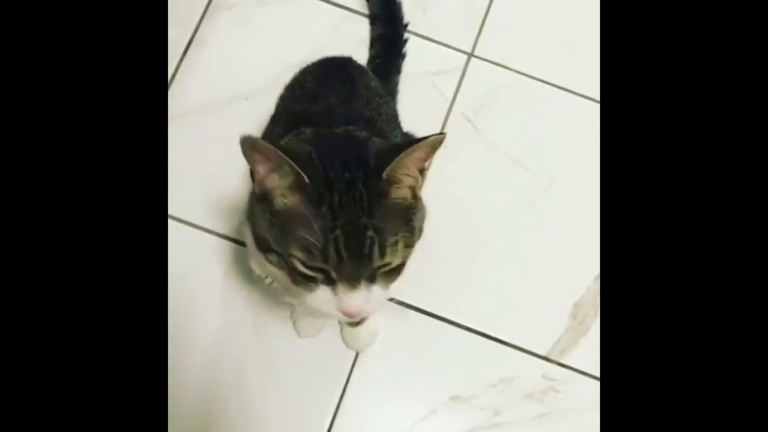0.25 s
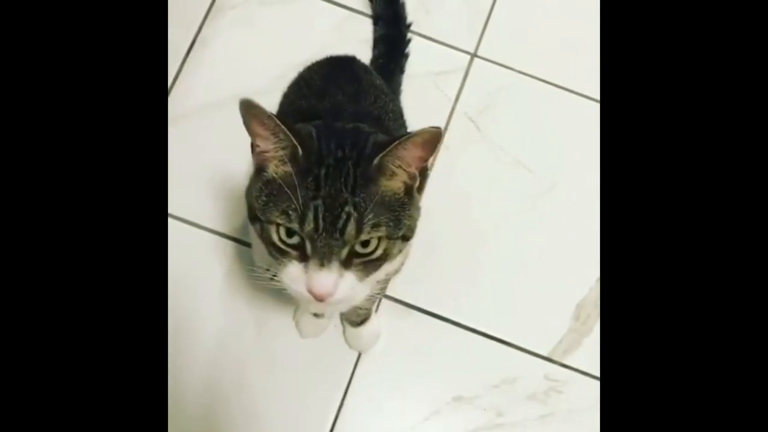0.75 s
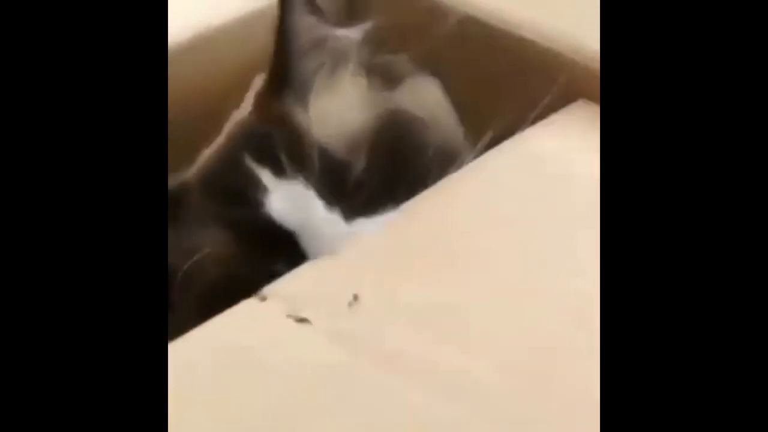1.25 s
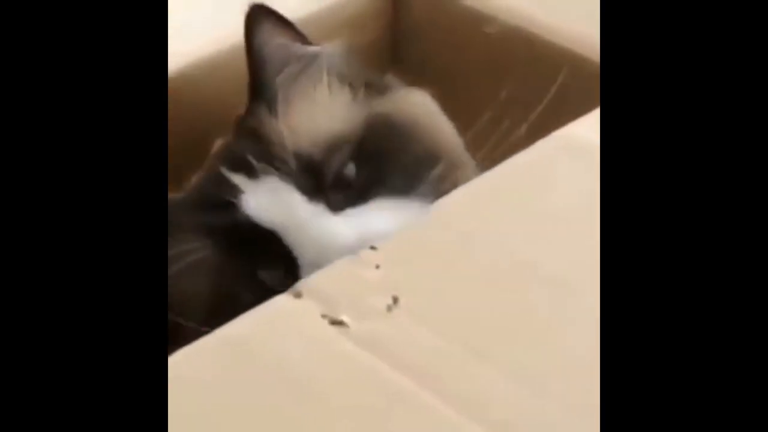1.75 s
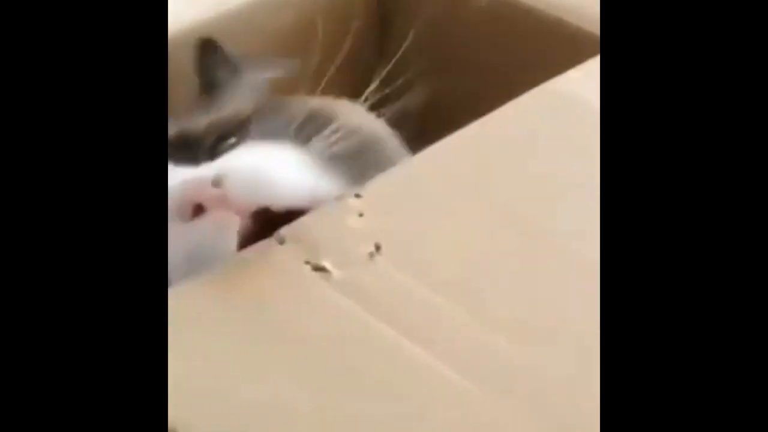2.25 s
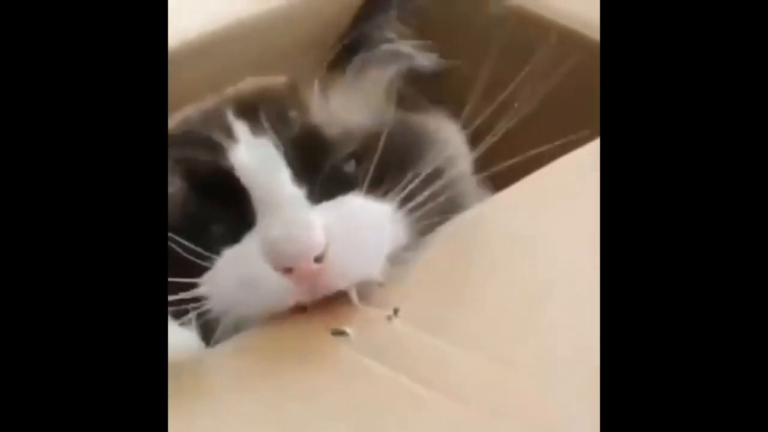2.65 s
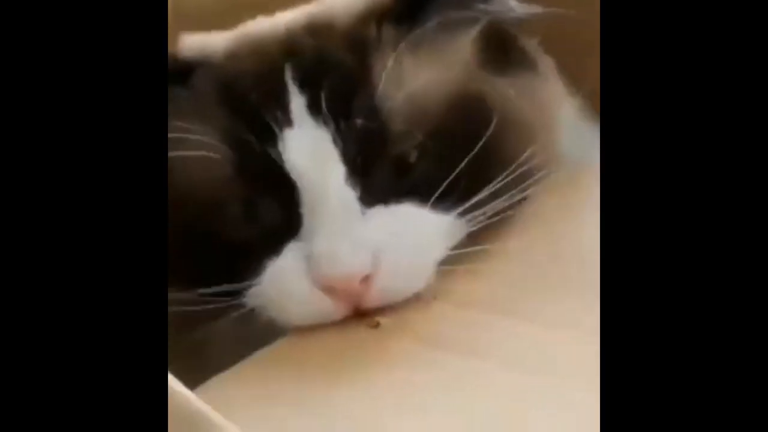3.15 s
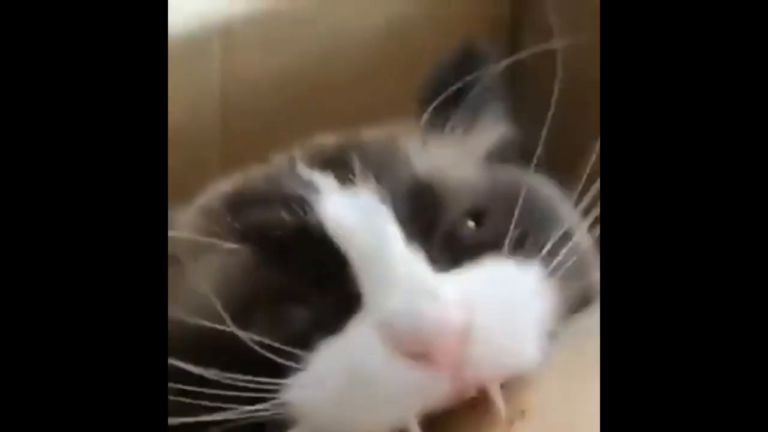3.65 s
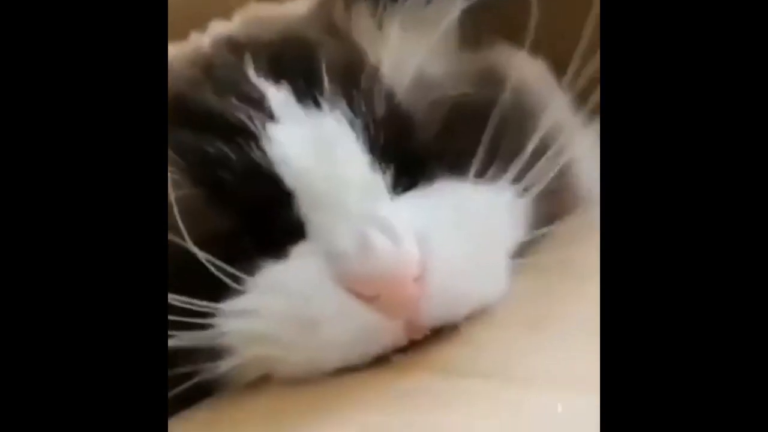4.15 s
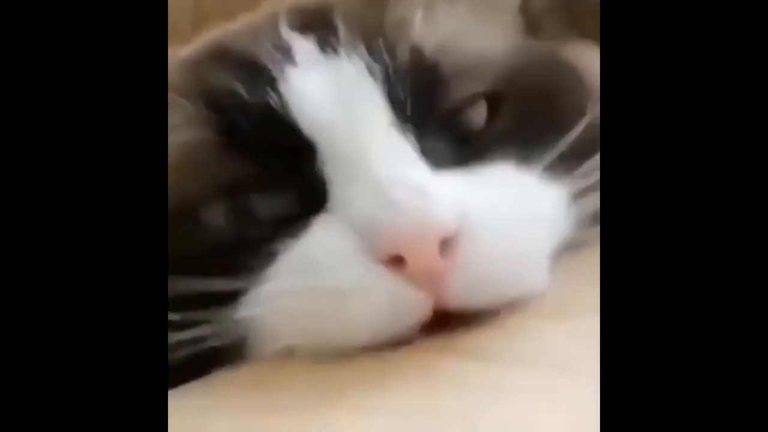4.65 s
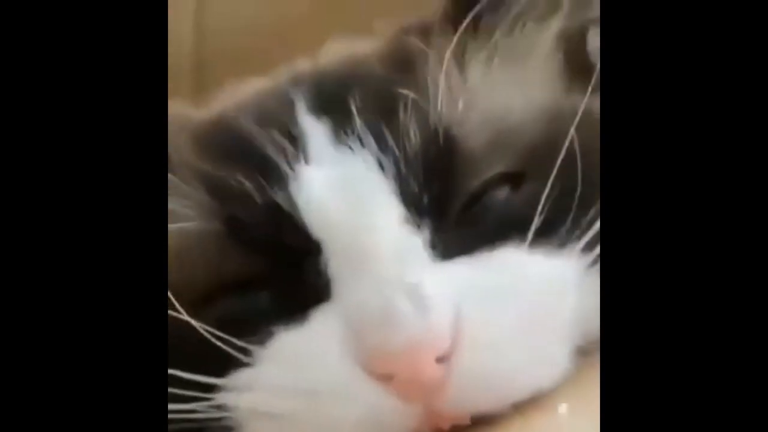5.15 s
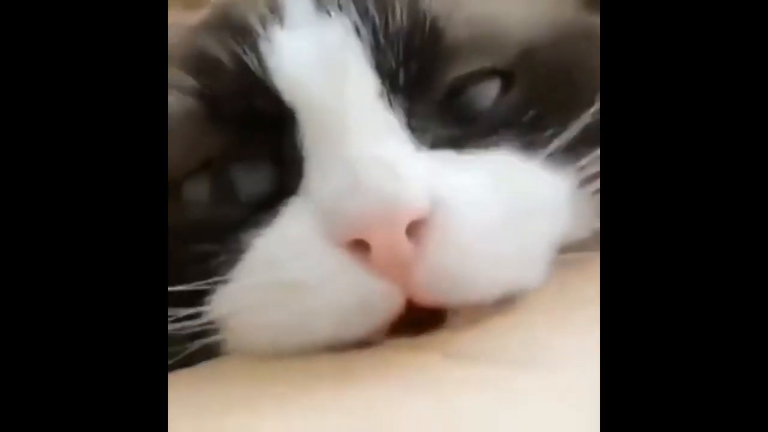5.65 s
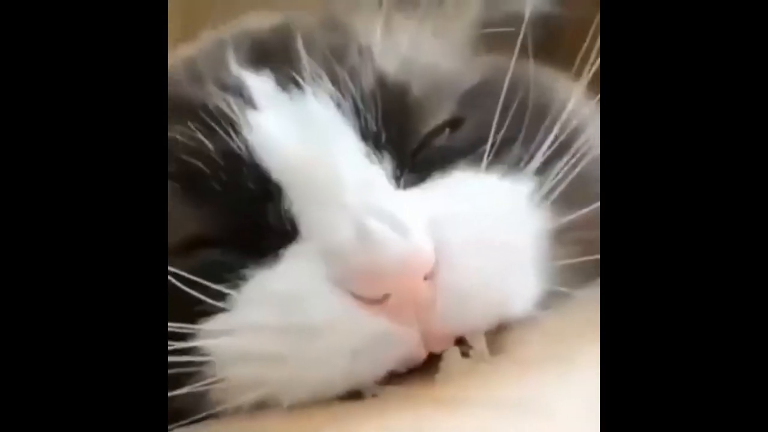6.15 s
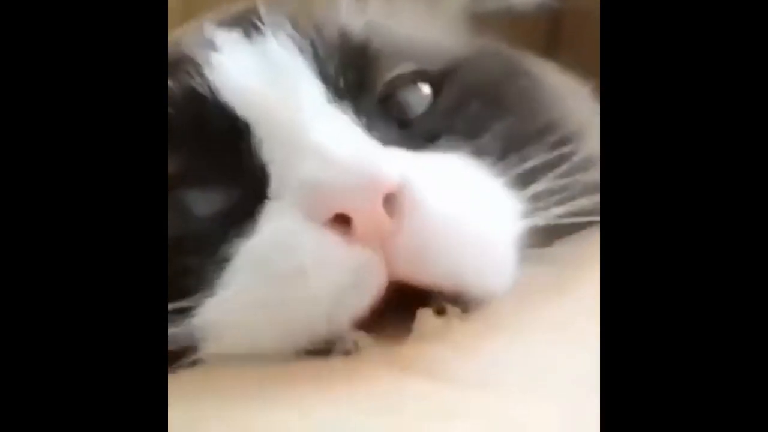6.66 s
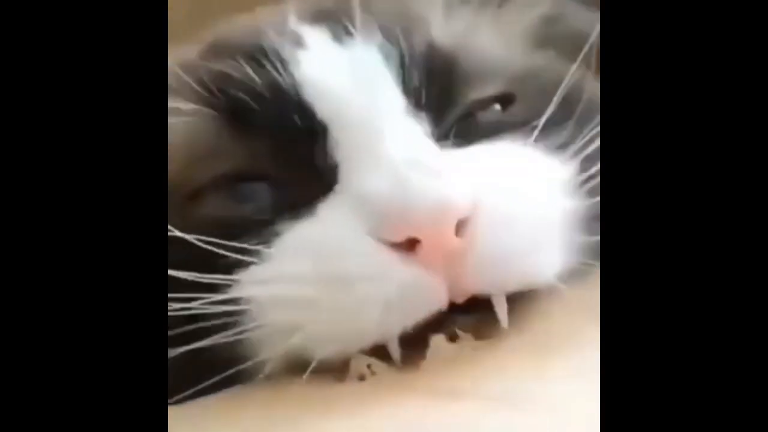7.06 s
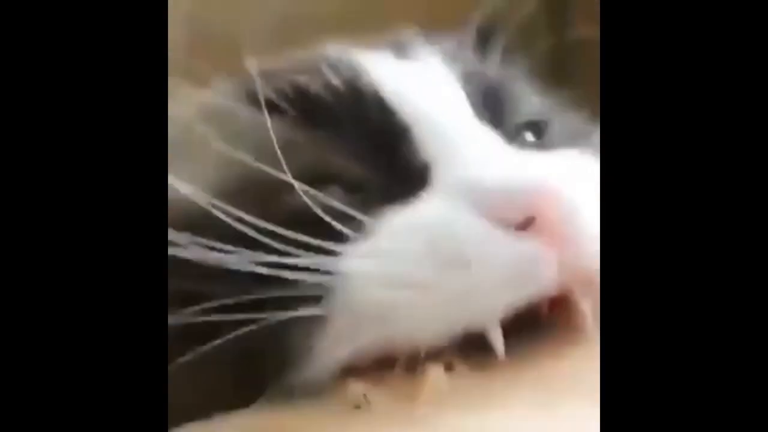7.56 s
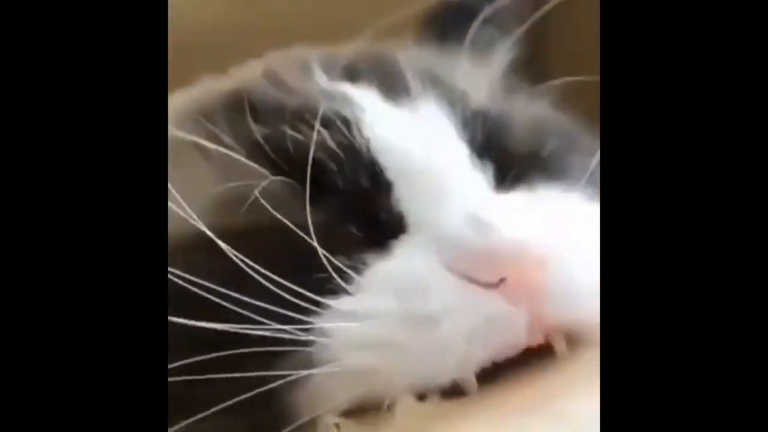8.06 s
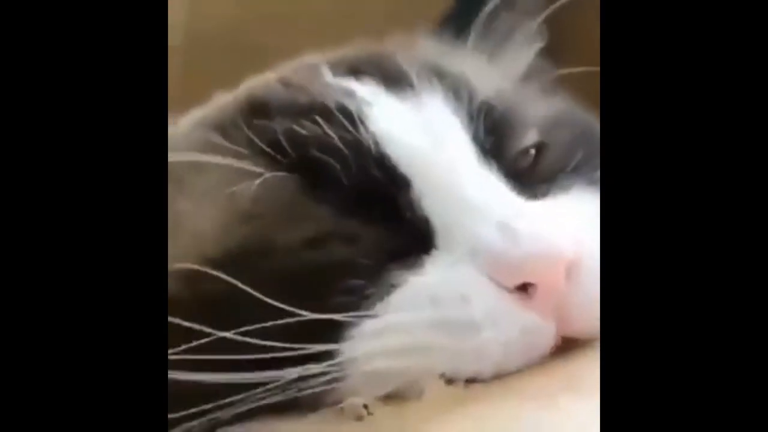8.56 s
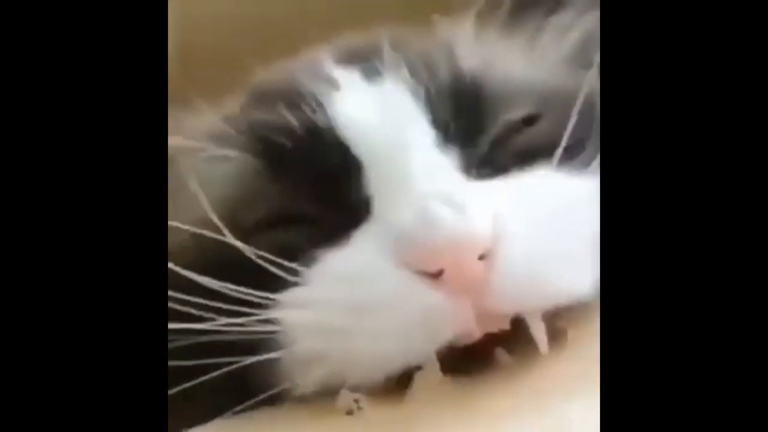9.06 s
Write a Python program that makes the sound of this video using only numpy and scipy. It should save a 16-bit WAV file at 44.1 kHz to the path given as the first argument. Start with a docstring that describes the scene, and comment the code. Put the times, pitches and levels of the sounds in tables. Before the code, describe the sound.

Close, irregular crunches and rasping tears of cardboard as a cat chews the edge of a box in a quiet room.

```python
"""Faint air in a quiet room, a short silence, then a cat gnaws the edge of a cardboard box close by.
Teeth rub and tear the paper fibres, and twice the muzzle drags along the edge. The flutes (the wavy
ribs inside cardboard) crack and crunch, the panel knocks as it buckles, and a slipping tooth groans
or squeaks. The box and the small room ring briefly after the bites."""
import sys
import numpy as np
from scipy import signal
from scipy.fft import rfft, irfft
from scipy.io import wavfile
from scipy.ndimage import uniform_filter1d

SR = 44100
rng = np.random.default_rng(int(sys.argv[2]) if len(sys.argv) > 2 else 0)


def output_pcm(signal):
    """Save a mono or channel-first signal as 16-bit PCM at the path in sys.argv[1].

    Samples are clipped to [-1, 1] before scaling.
    """
    pcm = np.clip(np.atleast_2d(signal).T, -1, 1) * 32767
    wavfile.write(sys.argv[1], SR, np.round(pcm).astype(np.int16))


N = 411012
TIME = np.arange(N) / SR

# Tone colours of the room air, the paper fibres, the flat panel and the hollow box.
# Each row: frequency in Hz, relative level in dB.
AIR_COLOUR = [(25, -10.5), (110, 1.5), (330, -9.5), (500, -16), (1000, -16), (2200, -27), (5000, -31.5),
              (14000, -35.5)]
FIBRE_COLOUR = [(1300, -26.5), (3000, -3.5), (5000, 0.5), (6500, -1.5), (8200, -0.5), (9600, -3),
                (12000, -0.5), (14000, -6.5)]
PANEL_COLOUR = [(400, -7), (720, 2.5), (1150, 2), (1750, -1), (2200, -0.5), (2900, -5.5), (4500, -15)]
BOX_COLOUR = [(25, -21), (100, -9), (200, -2.5), (400, 3), (620, 0.5), (1100, -21.5)]
# Strokes of the teeth over the paper. Each row: peak time, rise and fall in seconds,
# relative level of the fibre hiss in dB, panel rasp in dB above the hiss.
TOOTH_STROKES = [(2.15, .25, 0.32, -50, -11), (2.385, 0.036, 0.07, -56, 12.5), (2.65, 0.12, 0.11, -54, 2.5),
                 (2.83, 0.045, .03, -42, -10), (2.884, 0.031, 0.047, -34.5, -7),
                 (3.0, 0.029, 0.06, -36.5, -7.5), (3.075, 0.053, 0.069, -36, -6.5),
                 (3.24, 0.082, 0.054, -36, -11.5), (3.32, 0.052, 0.064, -29.5, -2),
                 (3.45, .06, 0.18, -49.5, 1.5), (3.8, 0.077, 0.13, -44, 0.5),
                 (3.94, 0.053, 0.025, -37.5, -2.5), (4.08, 0.11, 0.032, -35.5, -4),
                 (4.21, 0.18, 0.19, -42, -3.5), (4.385, 0.07, 0.052, -34, -8),
                 (4.46, 0.044, 0.1, -36, -10.5), (4.638, 0.014, .02, -40, -3.5),
                 (4.8, 0.12, 0.14, -43.5, -5), (4.935, .012, 0.27, -51.5, 7.5),
                 (5.275, 0.033, .045, -38.5, -3), (5.36, 0.033, .035, -37.5, -10.5),
                 (5.44, 0.03, 0.029, -38, -3.5), (5.52, 0.021, 0.068, -35, -9),
                 (5.64, 0.044, 0.099, -43.5, -2), (5.795, .015, 0.018, -35, -6.5),
                 (5.97, 0.11, 0.072, -43.5, 1.5), (6.05, 0.027, 0.02, -39.5, -7),
                 (6.125, 0.011, 0.034, -46, 3), (6.217, 0.035, 0.037, -41.5, -5),
                 (6.322, 0.03, 0.035, -32.5, -8), (6.49, 0.076, 0.15, -34.5, -5),
                 (6.63, 0.034, 0.017, -28, -3.5), (6.66, .02, 0.072, -45, -1),
                 (6.92, 0.062, 0.049, -44.5, 2.5), (7.035, 0.028, 0.091, -46, 2.5),
                 (7.21, 0.12, 0.035, -45, -5), (7.59, 0.042, 0.066, -35.5, 1), (7.846, .035, .03, -34, -1),
                 (7.96, 0.022, .07, -45, 3), (8.181, .06, 0.027, -35, -6),
                 (8.27, 0.033, 0.029, -36.5, -4.5), (8.36, 0.037, 0.034, -38.5, -3.5),
                 (8.445, 0.023, 0.013, -37.5, -5), (8.535, 0.061, 0.12, -35.5, -10),
                 (8.815, 0.019, .04, -43.5, 10), (8.89, 0.049, 0.088, -61, 16),
                 (9.005, 0.031, 0.023, -42, 2), (9.05, .03, 0.15, -54.5, 7.5),
                 (9.225, 0.012, .06, -40, -2.5)]
# Notes at which the box rings, under a hard bite and under a drag of the muzzle.
# Each row: frequency in Hz, width in Hz, gain in dB.
BITE_RESONANCES = [(272, 10.5, 1), (342.5, 22, 4.5), (446, 15, 10), (788, 59, -12), (1208, 150, 6)]
DRAG_RESONANCES = [(173, 51, 3.5), (232, 16, 0), (347.4, 5.8, 16), (830, 68, 0.5), (1470, 130, 7.5),
                   (2100, 640, 9), (11800, 930, 2)]
# Two drags of the muzzle, one list each. Each row: time in seconds, relative level of the fibre
# hiss in dB, then panel rasp and box rumble, both in dB above the hiss.
MUZZLE_DRAGS = [
    [(1.483, -39.5, -1.5, 2), (1.5, -36, -8.5, -11), (1.545, -35.5, -12, -22), (1.585, -52, -9, -7)],
    [(3.495, -41, -6, -2), (3.518, -28.5, 1.5, -5), (3.557, -24, -3, 0.5), (3.65, -26.5, -8, -13),
     (3.715, -18.5, -10, -19), (3.755, -43.5, -12, 4)],
]
# The loudest flutes cracking. Each row: start in seconds, relative level in dB, length of the main
# burst in seconds, ring of the torn flap in Hz, relative strength of the panel rasp in dB.
FLUTE_CRACKS = [(1.7327, -32, 0.00076, 5070, 9.5), (2.5406, -40, 0.0016, 3700, 12.5),
                (2.8776, -21.5, 0.0028, 5440, -9), (3.025, -45, 0.0033, 3700, 14),
                (3.0633, -19, 0.00046, 8700, -22), (3.0904, -22, 0.00059, 11100, -22),
                (3.8346, -32, 0.0027, 4140, 0), (3.941, -12, 0.00077, 4200, -9.5),
                (3.99, -19.5, 0.00094, 5840, -7), (4.009, -24.5, 0.0049, 7900, -7),
                (4.09, -24, .0012, 7500, -0.5), (4.195, -26.5, 0.0021, 12500, -20),
                (4.216, -14.5, 0.0014, 8400, -7.5), (4.284, -21, 0.006, 6100, -3),
                (4.3722, -23, 0.0013, 12200, -17), (4.4235, -14.5, 0.00062, 5800, -9),
                (4.92, -29, 0.0048, 7600, -2), (5.266, -20.5, 0.00064, 12300, 0),
                (5.2795, -26.5, 0.0035, 12400, -3), (5.3548, -27.5, 0.0049, 8500, 3.5),
                (5.3654, -26.5, 0.0012, 12400, 0), (5.5563, -21, 0.00081, 4600, 1),
                (5.572, -31, 0.0033, 4600, 4), (5.581, -19.5, 0.0029, 10200, -1),
                (5.5942, -17.5, 0.0017, 7540, 1), (6.2114, -33.5, 0.0027, 3820, -1.5),
                (6.315, -24.5, 0.0037, 5400, 4), (6.3808, -31, 0.0096, 10200, 1),
                (6.451, -30, 0.0033, 3700, 4.5), (6.5658, -20.5, 0.0017, 8200, -1.5),
                (6.579, -26, 0.0014, 7400, 4), (6.593, -23.5, 0.0005, 6400, -4),
                (6.614, -23, .0038, 7650, -13), (6.632, -28, 0.008, 7700, 2.5),
                (6.8499, -33, .0035, 8250, -10), (7.3545, -31.5, 0.00046, 7600, -14),
                (7.773, -29, 0.00092, 4100, -5), (7.941, -31, 0.0023, 10000, 2),
                (8.018, -23, 0.0011, 4380, -2.5), (8.0255, -20, 0.0005, 4450, -4),
                (8.086, -28, 0.0022, 4400, -1.5), (8.1097, -18.5, 0.00053, 5340, -9),
                (8.121, -22.5, 0.0004, 5000, -1), (8.1274, -23, 0.0012, 5300, -27),
                (8.143, -27, 0.00076, 5200, -8), (8.176, -29.5, .002, 5000, 1),
                (8.2033, -26, 0.00065, 5500, -16), (8.2334, -27, 0.0024, 7850, -5),
                (8.259, -24, .0027, 4700, -8), (8.275, -19.5, 0.0027, 4600, -6),
                (8.322, -26.5, 0.0051, 7500, -2.5), (8.347, -21.5, 0.0027, 4260, -2.5),
                (8.37, -24, 0.0046, 8000, -16), (8.3886, -23.5, 0.0069, 13300, -6),
                (8.435, -26, 0.0052, 8050, -9), (8.5256, -26.5, 0.00027, 7800, 6),
                (8.529, -24, .0036, 11500, -18), (8.715, -34.5, 0.002, 8000, 1.5),
                (8.792, -37, 0.0021, 4100, 15), (8.806, -29.5, 0.0065, 4500, 8.5),
                (8.826, -37, 0.0015, 3200, 14), (9.0072, -35.5, 0.0037, 4840, 9),
                (9.3163, -20, 0.0039, 7560, -3)]
# The panel buckling or let go by the teeth. Each row: start in seconds, relative level in dB,
# pitch in Hz that the knock slides down through, relative strength of the upper notes in dB.
PANEL_KNOCKS = [(1.7357, -31.5, 490, -11), (1.772, -47, 200, -22), (2.5371, -32, 305, -9),
                (2.6052, -36, 230, -29), (2.655, -38.5, 228, -24), (3.0659, -29, 244, -18),
                (3.0919, -34, 270, -14), (3.5807, -27.5, 270, 0), (3.8379, -26, 343, -6.5),
                (3.9431, -39, 333, -16), (4.286, -30.5, 420, -2), (4.422, -27, 447, -19),
                (4.92, -31.5, 350, -4), (5.138, -34.5, 352, -9.5), (5.2842, -33, 292, -19),
                (5.359, -33.5, 443, -17), (5.5964, -18.5, 430, -29), (5.637, -31.5, 440, -13),
                (5.891, -28.5, 315, -10), (5.898, -31, 170, -25), (6.315, -32, 291, -1),
                (6.326, -34, 330, -17), (6.8498, -16.5, 401, -6), (7.0343, -34, 403, -9),
                (7.1228, -31.5, 446, -9), (7.1362, -24, 312, -9), (7.298, -41.5, 464, -2),
                (7.535, -34, 474, -6), (7.754, -29.5, 305, -18), (7.7755, -19.5, 376, -12.5),
                (7.8587, -25.5, 343, -9), (8.2786, -29, 440, -10), (8.3982, -28.5, 365, -15),
                (8.4397, -33, 448, -23), (8.5293, -32, 477, -7), (8.793, -29, 523, 1.5),
                (8.8098, -32.5, 360, 0.5), (8.817, -25, 440, -11), (9.0103, -25.5, 437, -0.5),
                (9.2236, -22, 360, -10), (9.3158, -29, 466, -5)]
# The panel's upper notes. Each row: frequency in Hz, seconds to fade by 60 dB, relative level in dB.
PANEL_NOTES = [(903, 0.0055, 14.5), (1041, 0.023, 1), (1230, 0.018, -18), (1680, 0.027, -8),
               (1950, 0.016, -12)]
# A tooth slipping regularly, from a low groan to a thin squeak.
# Each row: start in seconds, length in seconds, pitch in Hz, relative level in dB.
TOOTH_SQUEAKS = [(3.562, 0.26, 348, -34.5), (4.965, 0.1, 984, -39), (6.776, .085, 7640, -46.5)]

AIR_PAUSE_S, BITES_START_S = 1.02, 1.4
CLAMP_S = 4.15  # the jaws clamp the loose flap of the box


def gain(db):
    """Turn decibels into a number to multiply by."""
    return 10 ** (np.asarray(db) / 20)


def unit(x):
    """Scale a signal to an average (rms) level of 1."""
    return x / np.sqrt(np.mean(x ** 2) + 1e-18)


def add(track, start_s, sound):
    """Mix a sound into a track at the given time."""
    i = int(start_s * SR)
    part = sound[:max(N - i, 0)]
    track[i:i + len(part)] += part


def colour(x, shape):
    """Give a sound a tone colour; white noise keeps its power."""
    size = 4096
    hz, db = np.transpose(shape)
    bin_hz = np.arange(size // 2 + 1) * SR / size
    log_gain = np.log(gain(np.interp(np.log(bin_hz + 1), np.log(hz), db)))
    # build the filter so that it never rings before the sound arrives
    cepstrum = irfft(log_gain)
    cepstrum[1:size // 2] *= 2
    cepstrum[size // 2 + 1:] = 0
    response = irfft(np.exp(rfft(cepstrum)))
    return signal.oaconvolve(x, response / np.linalg.norm(response))[:len(x)]


def resonate(x, hz, width_hz):
    """Ring at one frequency; the narrower the width, the longer the ring."""
    hz = min(hz, .45 * SR)
    return signal.lfilter(*signal.iirpeak(hz, hz / width_hz, fs=SR), x)


def fade(t, t60):
    """Die away by 60 dB every t60 seconds."""
    return np.exp(-np.log(1000) * t / t60)


def wander(rate):
    """Drift at random, taking `rate` steps a second."""
    steps = rng.standard_normal(int(N / SR * rate) + 2)
    return unit(np.interp(TIME * rate, np.arange(len(steps)), steps))


def room_air():
    """Faint rumble and hiss of the house, silent for a moment before the gnawing."""
    heard = (TIME < AIR_PAUSE_S) | (TIME > BITES_START_S)
    return gain(-66.5) * colour(rng.standard_normal(N), AIR_COLOUR) * heard


def stroke_levels():
    """Hiss in dB and rasp in dB above it: each stroke swells and fades over the brushing muzzle."""
    hiss_power = gain(-54 - 0.5 * wander(4)) ** 2  # the muzzle keeps brushing the edge
    rasp_power = hiss_power * gain(2) ** 2
    for peak_s, rise, fall, db, rasp_db in TOOTH_STROKES:
        near = slice(*np.searchsorted(TIME, (peak_s - 3 * rise, peak_s + 3 * fall)))
        t = TIME[near] - peak_s
        swell = np.exp(-np.maximum(-t / rise, t / fall) ** 1.5)  # power 1 is pointed, 2 is a bell
        hiss_power[near] += (gain(db) * swell) ** 2
        rasp_power[near] += (gain(db + rasp_db) * swell) ** 2
    return 10 * np.log10(hiss_power), 10 * np.log10(rasp_power / hiss_power)


def friction(hiss_db, rasp_db, rumble_db, touching, slip_db, grain_db=2.0):
    """Stick and slip: uneven showers of snapping fibres hiss and shake the panel and the box."""
    # a harder bite slips more jerkily; a light touch is a smooth hiss
    grip = np.clip((hiss_db + 55.5) / 13, .15, 1)
    spread = np.log(gain(slip_db)) * grip
    slips = np.exp(spread * unit(wander(170) + wander(900)) - spread ** 2)
    out = 0
    for shape, db in ((FIBRE_COLOUR, 0), (PANEL_COLOUR, rasp_db), (BOX_COLOUR, rumble_db)):
        snaps = unit(rng.standard_normal(N) * gain(grain_db * grip * wander(6000)))
        out = out + colour(snaps * slips * touching * gain(hiss_db + db), shape)
    return out


def box_ring(x, resonances):
    """The shaken box rings at several of its own notes."""
    return sum(gain(db) * resonate(x, hz, width) for hz, width, db in resonances)


def paper_shreds(x, depth, rate):
    """Loose shreds of paper ring for a moment each, so the colour keeps changing."""
    pitches = np.geomspace(1600, 12000, num=9)
    return depth * sum(resonate(x, hz, hz / 6) * wander(rate) for hz in pitches)


def teeth_rubbing(hiss_db, rasp_db):
    """Teeth slide over the paper. A firm bite rings the box, and the flap drones while it is free."""
    free = np.clip((CLAMP_S - TIME) * 10 + .5, 0, 1)
    rumble_db = rasp_db - 3.5 * free - 1.5 * (1 - free)  # stronger once the flap is clamped
    rub = friction(hiss_db, rasp_db, rumble_db, TIME >= BITES_START_S, slip_db=2)
    power = uniform_filter1d(rub ** 2, SR // 20)
    firm_rub = rub * power / (power + gain(-36.0) ** 2)
    flap = gain(3) * resonate(rub * free, hz=225, width_hz=24)
    return rub + box_ring(firm_rub, BITE_RESONANCES) + flap + paper_shreds(firm_rub, depth=0.68, rate=45)


def muzzle_drags():
    """The muzzle scrapes along the edge, catching unevenly and keeping the box ringing."""
    scrape = 0
    for drag in MUZZLE_DRAGS:
        times, *columns = np.transpose(drag)
        touching = (TIME >= times[0]) & (TIME <= times[-1])
        hiss_db, rasp_db, rumble_db = (np.interp(TIME, times, column) for column in columns)
        scrape = scrape + friction(hiss_db, rasp_db, rumble_db, touching, slip_db=0.6)
    ringing = box_ring(scrape, DRAG_RESONANCES) + paper_shreds(scrape, depth=0.23, rate=30)
    return gain(-3.5) * (scrape + ringing)


def flute_cracks(rows):
    """A flute strains, then gives way in a burst of snapping fibres that rings the torn flap."""
    fibres, flaps, panel = np.zeros((3, N))
    t = np.arange(SR // 20) / SR
    for start_s, db, length, ring_hz, rasp_db in rows:
        progress = t / max(length, 1 / SR)
        snap_noise, panel_noise, jitter, strain_noise = rng.standard_normal((4, len(t)))
        burst = progress * np.exp(-1.45 * progress) * gain(2.7 * jitter)
        strength = gain(db) * np.sqrt(length / t[-1])
        snap = unit(burst * snap_noise) * strength
        # fibres begin to give just before the crack
        strain = unit(strain_noise * np.exp((t - t[-1]) / 0.0058)) * strength * gain(-19)
        add(fibres, start_s - t[-1], strain)
        add(fibres, start_s, snap)
        add(flaps, start_s, unit(resonate(snap, ring_hz, width_hz=530)) * strength)
        add(panel, start_s, unit(burst * panel_noise) * strength * gain(rasp_db))
    snaps = gain(-3.0) * colour(fibres, FIBRE_COLOUR) + gain(-7.5) * flaps
    body = gain(-8.5) * colour(panel, PANEL_COLOUR) + gain(-11.5) * colour(panel, BOX_COLOUR)
    return snaps + paper_shreds(snaps, depth=0.64, rate=60) + body + box_ring(body, BITE_RESONANCES)


def panel_knocks():
    """The panel jumps: a short low note and a few upper ones, echoed by the far wall of the box."""
    out = np.zeros(N)
    t = np.arange(SR // 8) / SR
    upper = sum(gain(db) * fade(t, t60) * np.sin(2 * np.pi * hz * t) for hz, t60, db in PANEL_NOTES)
    # the pitch falls as the bent panel relaxes, and soft paper blunts the blow
    relaxing_time = np.cumsum(0.92 + 0.19 * fade(t, 0.017)) / SR
    soft_start = 1 - np.exp(-t / 0.00039)
    for start_s, db, hz, upper_db in PANEL_KNOCKS:
        low = fade(t, 0.022) * np.sin(2 * np.pi * hz * relaxing_time)
        knock = gain(db + 11.0) * soft_start * (low + gain(upper_db - 7.5) * upper)
        echo_s = 0.00746 * (1 + 0.13 * rng.standard_normal())
        add(out, start_s, knock)
        add(out, start_s + echo_s, gain(-10.0) * knock)
    # air slips round the open panel, so it gives off little bass
    return signal.sosfilt(signal.butter(1, 220, "high", fs=SR, output="sos"), out)


def tooth_squeaks():
    """A tooth sticks and slips fast enough to make a short, slightly rough note."""
    out = np.zeros(N)
    for start_s, length, hz, db in TOOTH_SQUEAKS:
        swell = np.hanning(int(length * SR))
        slip_hz = hz + 4 * hz ** .75 * rng.standard_normal(len(swell))
        tone = resonate(np.sin(2 * np.pi * np.cumsum(slip_hz) / SR), hz, hz / 4)
        add(out, start_s, gain(db) * swell * unit(tone))
    return out


def small_crack_rows(hiss_db, count, length_s=0.00041, rasp_db=-5):
    """Once the jaws clamp, faint cracks come at random, stronger when the teeth press harder."""
    starts, ring_hz = rng.uniform((CLAMP_S, 3730), (TIME[-1], 8600), (count, 2)).T
    levels_db = np.interp(starts, TIME, hiss_db) + 6 + 3 * rng.standard_normal(count)
    return [(start_s, db, length_s, hz, rasp_db) for start_s, db, hz in zip(starts, levels_db, ring_hz)]


def echoes(x, db, t60, shape):
    """Many reflections in the box or the room blur into one fading tail."""
    t = np.arange(SR // 2) / SR
    tail = colour(rng.standard_normal(len(t)), shape) * fade(t, t60) * (1 - np.exp(-t / 0.0012))
    return gain(db) * signal.oaconvolve(x, tail / np.linalg.norm(tail))[:N]


def scene():
    """Mix the gnawing, its echoes and the room air into one channel."""
    hiss_db, rasp_db = stroke_levels()
    crunch = flute_cracks(FLUTE_CRACKS + small_crack_rows(hiss_db, count=240))
    knocks, drags = panel_knocks(), muzzle_drags()
    sliding = gain(-1.6) * (teeth_rubbing(hiss_db, rasp_db) + drags + tooth_squeaks())
    tails = (echoes(drags, db=-15, t60=0.11, shape=PANEL_COLOUR)
             + echoes(crunch, db=-11.5, t60=0.035, shape=FIBRE_COLOUR)
             + echoes(knocks, db=-29, t60=1.0, shape=PANEL_COLOUR)
             + echoes(knocks, db=-27, t60=0.3, shape=BOX_COLOUR))
    return (room_air() + sliding + crunch + knocks + tails)[None]


def record(dry):
    """Cut away the highest treble, above 14100 Hz."""
    return signal.sosfilt(signal.ellip(10, .2, 70, 14100, fs=SR, output="sos"), dry)


dry = scene()
out = record(dry)
output_pcm(out)
```